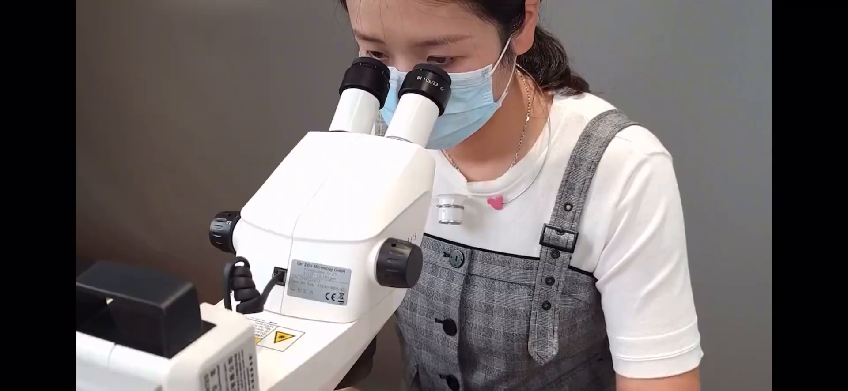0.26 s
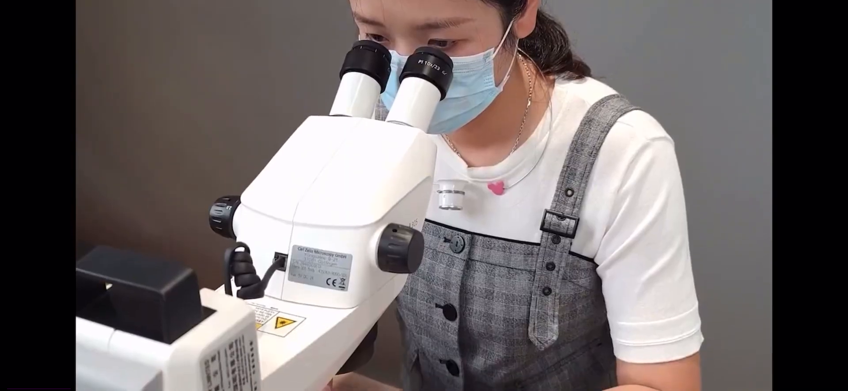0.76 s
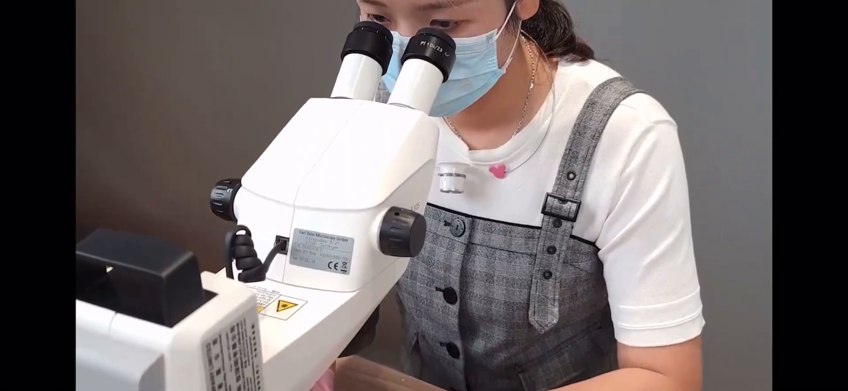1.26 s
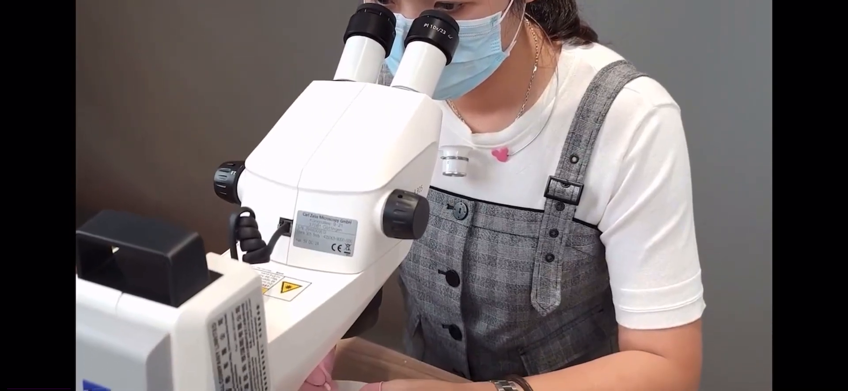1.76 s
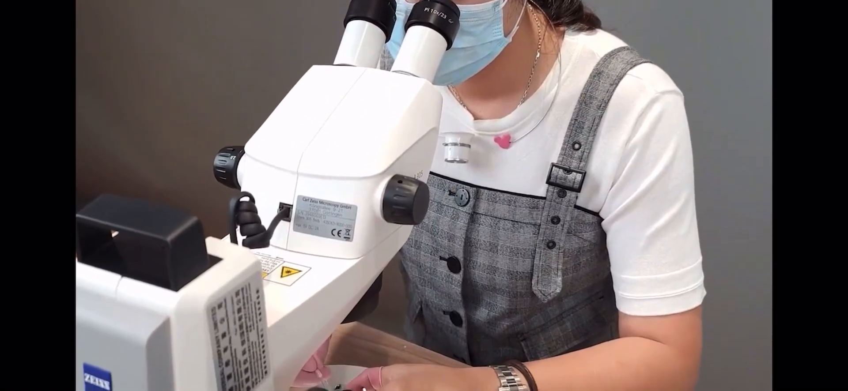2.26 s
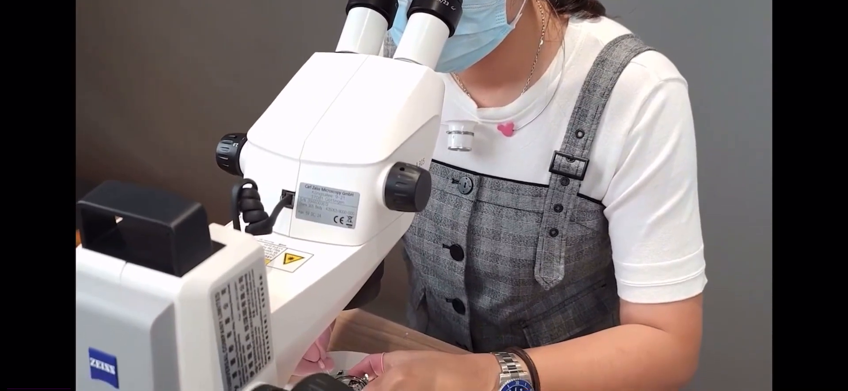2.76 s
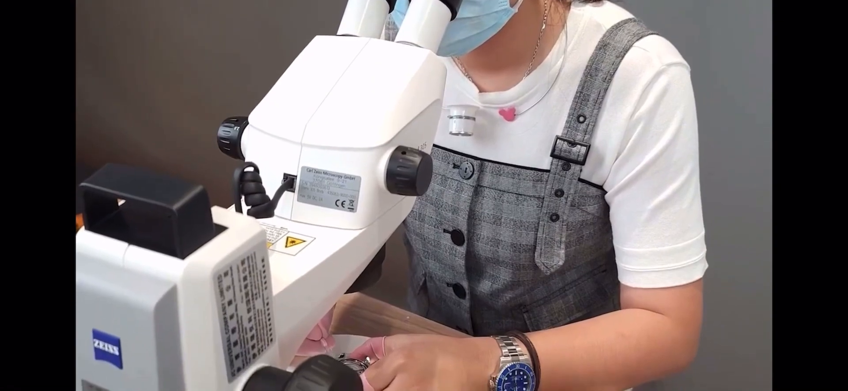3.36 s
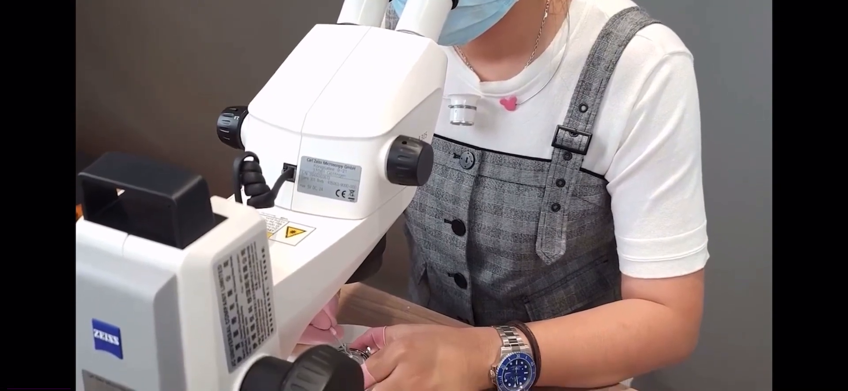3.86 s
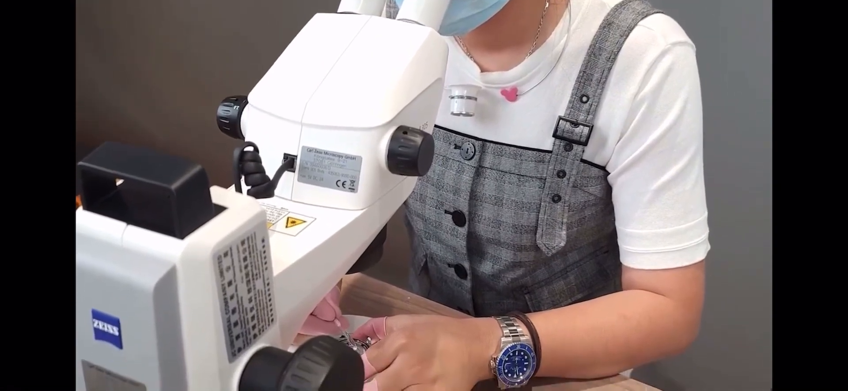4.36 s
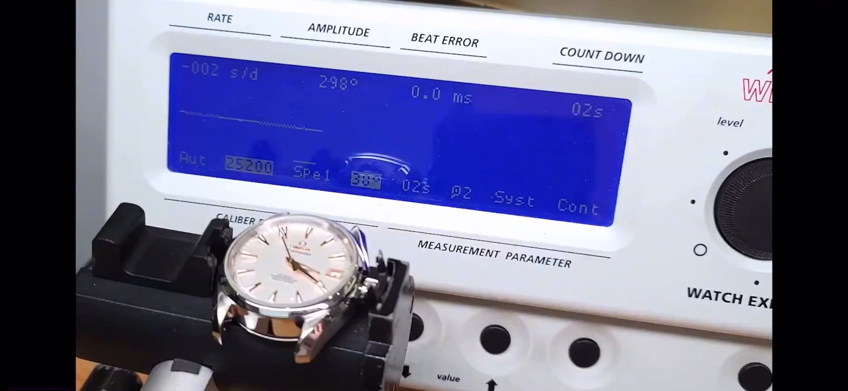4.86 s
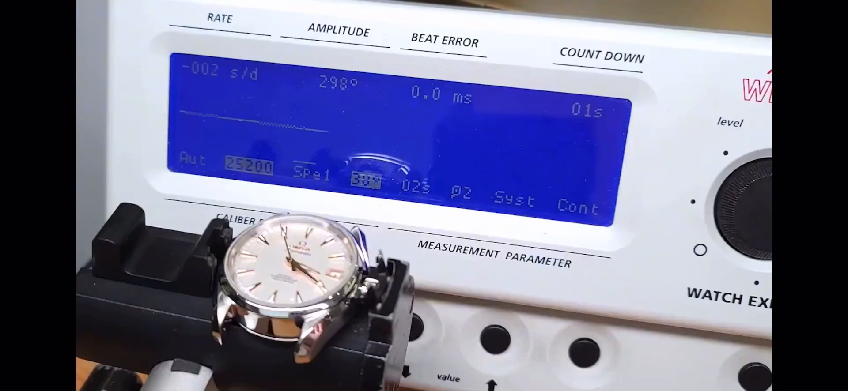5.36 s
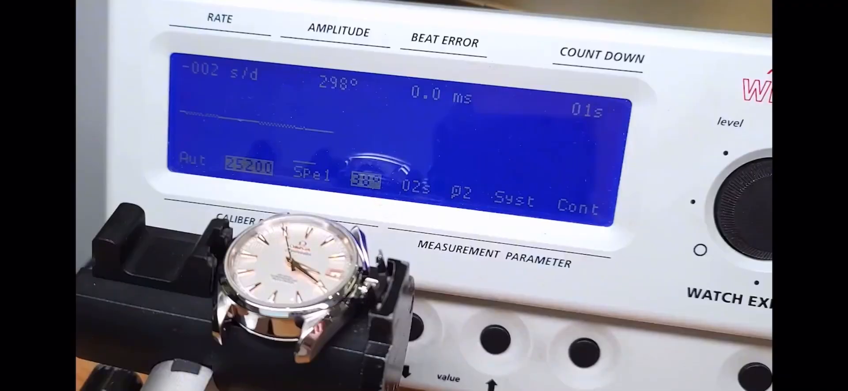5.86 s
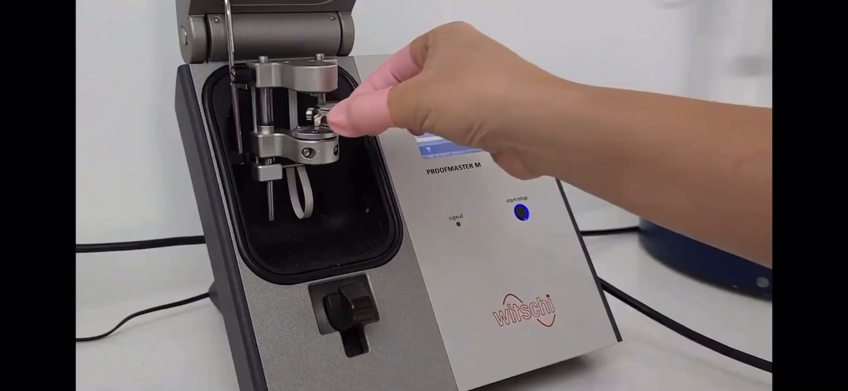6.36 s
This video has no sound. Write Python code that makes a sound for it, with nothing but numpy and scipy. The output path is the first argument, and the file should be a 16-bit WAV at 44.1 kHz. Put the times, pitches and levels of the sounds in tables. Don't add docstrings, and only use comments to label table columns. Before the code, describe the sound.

Quiet room with low ventilation rumble and crickets chirping, then a loud, bright, metallic watch tick cuts in at seven beats a second and stops abruptly.

```python
import sys
import numpy as np
from scipy import signal
from scipy.fft import rfft, irfft, next_fast_len
from scipy.io import wavfile
from scipy.ndimage import uniform_filter1d, map_coordinates

SR = 44100
rng = np.random.default_rng(int(sys.argv[2]) if len(sys.argv) > 2 else 0)


def to_wav(s):
    ch = np.atleast_2d(s).T
    pcm = np.round(np.clip(ch, -1, 1) * 32767)
    wavfile.write(sys.argv[1], SR, pcm.astype(np.int16))


def nominal_scale(level):
    x = np.asarray(level, float) / 20
    return 10 ** x


N = 291060

WATCH_ON_S, WATCH_OFF_S = 4.5675, 6.338
# centre_hz, width_hz, level_db
CASE_MODES = [(5610, 210, 7), (7330, 140, -6.5), (7866, 420, 11), (8670, 100, 6), (10060, 140, -1),
              (10450, 100, -68), (11420, 180, 3), (13900, 400, 1), (14450, 210, -1.5)]


def unit(x):
    return x / np.sqrt(np.mean(x ** 2) + 1e-20)


def along(points, hz):
    f, v = np.transpose(points)
    return np.interp(np.log(hz + 1), np.log(f + 1), v)


def wobble(rate):
    knots = rng.standard_normal(int(N * rate / SR) + 4)
    return map_coordinates(knots, [np.arange(N) * rate / SR])


def filtered(x, response):
    m = next_fast_len(N + 8192)
    return irfft(rfft(x, m) * response(np.fft.rfftfreq(m, 1 / SR)), m)[..., :N]


def closed(spectrum):
    return lambda hz: nominal_scale(along(spectrum, hz)) * (hz > spectrum[0][0]) * (hz < spectrum[-1][0])


def rush(gain, alike):
    def turn(hz):
        return np.arccos(np.clip(along(alike, hz), -1, 1)) / 2

    def mid_side(hz):
        return gain(hz) * [np.cos(turn(hz)), np.sin(turn(hz))]

    mid, side = filtered(rng.standard_normal((2, N)), mid_side)
    return unit(np.array([mid + side, mid - side]))


def mottled(x, depth_db):
    z = signal.stft(x, nperseg=512)[2]
    field = uniform_filter1d(rng.standard_normal(z.shape[1:]), size=2, axis=0)
    field = uniform_filter1d(field, size=12, axis=1)
    return unit(signal.istft(z * nominal_scale(depth_db * unit(field)), nperseg=512)[1][:, :N])


def echoed(x, pan_db, wet_db, t60):
    t = np.arange(SR // 4) / SR
    tail = rng.standard_normal((2, len(t))) * nominal_scale(-60 * t / t60)
    wet = signal.fftconvolve(x[None], tail / np.linalg.norm(tail[0]), axes=1)[:, :N]
    return x * nominal_scale([[pan_db / 2], [-pan_db / 2]]) + nominal_scale(wet_db) * wet


def strokes(rows, sag, bend, square, octave_db):
    out = np.zeros(N + SR)
    for s, ms, db, hz in rows:
        u = np.linspace(0, 1, round(ms * SR / 1000))
        phase = 2 * np.pi * np.cumsum(hz * (1 + sag * (0.56 ** bend - u ** bend))) / SR
        tone = np.sin(phase) + nominal_scale(octave_db) * (.5 + u) * np.sin(2 * phase)
        envelope = np.tanh(square * np.sin(np.pi * u) ** 2) / np.tanh(square)
        out[round(s * SR):][:len(u)] += nominal_scale(db) * envelope * tone
    return out[:N]


def lengthened(rows, factor):
    return [(s - ms * (factor - 1) / 2000, ms * factor, db, hz) for s, ms, db, hz in rows]


def watch():
    hits = contacts()
    now = np.arange(N) / SR
    gate = np.clip((now - WATCH_ON_S) / 0.00054, 0, 1) * np.clip((WATCH_OFF_S - now) / 0.0056, 0, 1)
    return gate * (struck_case(hits) * nominal_scale([[-.2], [.2]]) + ringing_room(hits))


def contacts():
    # drop_s, drop_db, bounce_after_ms, bounce_db, low_modes_db
    escapement_beats = [(4.6578, -17, 1.8, -14, -16), (4.8011, -8, 1.7, -13, -11),
                        (4.9438, -17, 1.4, -16, -8), (5.0868, -11, 1.7, -15, -13),
                        (5.2299, -15, 1.3, -15, -8), (5.3727, -8, 2.0, -13, -17),
                        (5.5161, -5.5, 2.1, -18, -26), (5.6578, -11, 2.1, -9, -15),
                        (5.8022, -12, 2.9, -25, -11), (5.9437, -8, 1.8, -8, -14),
                        (6.0864, -15, 1.4, -13, -6), (6.2292, -8, 1.8, -15, -12)]
    unlock_lead_ms, unlock_db = 4.9, (-26.5, -29.5)
    unlock_low_db, unlock_high_db = -13.5, -4.5
    settle_ms, settle_db = 1.5, -5.5
    rows = []  # start_s, peak_db, low_modes_db, high_modes_db
    for k, (s, db, bounce_ms, bounce_db, low_db) in enumerate(escapement_beats):
        bounce_s = s + bounce_ms / 1000
        high_db = -10 + 1.5 * (-1) ** k
        rows.append((s - unlock_lead_ms / 1000, unlock_db[k % 2], unlock_low_db, unlock_high_db))
        rows.append((s, db, low_db, high_db))
        rows.append((bounce_s, bounce_db, low_db, high_db))
        rows.append((bounce_s + settle_ms / 1000, bounce_db + settle_db, low_db, high_db))
    return rows


def struck_case(hits):
    t = np.arange(-88, 800) / SR
    hz, _, mode_db = np.transpose(CASE_MODES)[:, :, None]
    dry = np.zeros(N + SR)
    luck = rng.standard_normal((len(hits), 3, len(CASE_MODES), 1))
    for (s, db, low_db, high_db), (size, turn, lag) in zip(hits, luck):
        share_db = np.where(hz < 6700, low_db + 9.0, np.where(hz > 9500, high_db + 9.5, 0))
        modes = nominal_scale(mode_db + share_db + 2.14 * size) * np.cos(2 * np.pi * hz * t + np.pi * turn)
        late = t - .0002 * lag
        t60 = .012 if db < -23 else .0042
        onset, decay = np.exp(-(late / 0.00072) ** 2), nominal_scale(-60 * np.abs(late) / t60)
        ring = (modes * np.where(late < 0, onset, decay)).sum(0)
        dry[round((s + .0005) * SR) - 88:][:len(t)] += nominal_scale(db + 1) * ring / np.abs(ring).max()

    def loudspeaker(f):
        return 1 / np.sqrt(1 + (4700 / (f + 1)) ** 16 + (f / 15300) ** 24) + 0.012 * (f > 900)

    return filtered(dry[:N], loudspeaker)


def ringing_room(hits):
    # pitch_hz, level_db per Hz
    room_ringing = [(4400, -25), (4850, -34.5), (5150, -9), (5500, -6.5), (6200, -9), (6760, -12.5),
                    (7400, -3), (8600, -5.5), (9500, -11.5), (12600, -13.5), (13550, -25.5), (14400, -7.5),
                    (14900, -27), (15200, -44)]
    energy = np.zeros(N)
    for s, db, *_ in hits:
        energy[round(s * SR)] = nominal_scale(1.25 * db - 5)
    energy[round(4.516 * SR)] = nominal_scale(2 * -5.5)
    t = np.arange(SR) / SR

    def fade(t60, rise):
        decay = nominal_scale(-120 * t / t60) * (1 - np.exp(-t / rise))
        return np.sqrt(np.abs(signal.fftconvolve(energy, decay)[:N]))

    def tilted(db_per_octave):
        return lambda f: closed(room_ringing)(f) * nominal_scale(db_per_octave * np.log2(f / 8000 + 1e-3))

    def case_peaks(f):
        return 1 + sum(0.38 / (1 + (2 * (f - c) / w) ** 2) for c, w, _ in CASE_MODES)

    rattle = nominal_scale(-13.5) * fade(0.026, 0.0013) * rush(tilted(0.27), [(5000, 0.58)])
    dull = mottled(rush(tilted(-1), [(5000, 0.62), (14000, 0.31)]), depth_db=3.5)
    bright = mottled(rush(tilted(1.3), [(5000, 0.79), (14000, 0.38)]), depth_db=5.0)
    tail = nominal_scale(-34.5) * fade(0.74, 0.0081) * dull + nominal_scale(-34.0) * fade(0.41, 0.0084) * bright
    flutter = nominal_scale(2.2 * wobble(110))
    return rattle + flutter * filtered(tail, case_peaks)


def crickets():
    return near_cricket() + rival_cricket() + left_crickets() + low_cricket() + triller()


def near_cricket():
    near = strokes(lengthened(near_strokes(), 1.3), sag=.06, bend=4, square=1.8, octave_db=-24)
    return nominal_scale(-1.1) * echoed(near, 0, wet_db=-20.5, t60=0.26)


def near_strokes():
    # start_s, strokes, peak_db
    near_chirps = [
        (1.7494, 8, -29),
        (2.0295, 8, -29.7),
        (2.3096, 8, -29.5),
        (2.5933, 8, -29.3),
        (3.0741, 7, -30),
    ]
    first_gap_ms, gap_growth_ms = 13.5, .6
    first_stroke_ms, stroke_growth_ms = 8.2, .45
    slip_s, slip, delay_ms = 3.147, (6.6, -33, 4800), 1.6
    rows = []  # start_s, length_ms, peak_db, pitch_hz
    for start, count, db in near_chirps:
        for k in range(count):
            s = start + (k * first_gap_ms + gap_growth_ms * k * (k - 1) / 2) / 1000
            if abs(s - slip_s) < .005:
                rows.append((s, *slip))
                continue
            s += delay_ms / 1000 * (s > slip_s)
            rows.append((s, first_stroke_ms + stroke_growth_ms * k, db - 4 * (k == 0), 4915 - 50 / 3 ** k))
    return np.array(rows) + rng.standard_normal((len(rows), 4)) * (.0003, .4, .6, 14)


def rival_cricket():
    # start_s, strokes, peak_db
    rival_chirps = [
        (1.66, 6.8, -55),
        (1.92, 15, -56.5),
        (2.22, 8.8, -59),
        (2.53, 8, -57),
        (2.85, 6.5, -56.5),
        (3.19, 4.3, -54),
    ]
    rows = [(s + .016 * k, 12, db, 4930) for s, count, db in rival_chirps for k in range(int(count))]
    rival = strokes(rows, sag=0.23, bend=4.8, square=4.0, octave_db=-13.5)
    return echoed(rival, pan_db=-2.0, wet_db=-7, t60=0.27)


def left_crickets():
    # first_full_stroke_s, full_strokes, peak_db
    left_chirps = [(.091, 4, -50), (.413, 4, -52), (.699, 3, -51.5), (1.052, 3, -51.5), (1.359, 3, -51),
                   (1.657, 3, -49), (1.946, 4, -49.5), (2.259, 3, -48.5), (2.561, 3, -50),
                   (2.883, 3, -50.5), (3.185, 3, -48.5), (3.464, 3, -50.5), (3.771, 3, -48.5),
                   (4.058, 3, -51), (4.376, 3, -50.5), (4.756, 3, -49), (5.075, 3, -49), (5.39, 3, -48.5),
                   (5.705, 3, -45.5), (6.113, 3, -48.5), (6.395, 3, -53)]
    # first_full_stroke_s, full_strokes, peak_db
    slow_chirps = [(.55, 3, -54.5), (.894, 3, -57), (1.245, 2, -54.5), (1.59, 2, -56), (2.414, 2, -56),
                   (2.745, 3, -56), (3.884, 1, -55), (4.184, 2, -54), (4.588, 3, -51), (4.997, 2, -51.5),
                   (5.278, 1, -55), (6.261, 1, -50), (6.53, 2, -55)]
    both = [*left_strokes(left_chirps, 33.5, 0), *left_strokes(slow_chirps, 38.5, shift_hz=-100)]
    left = strokes(lengthened(both, 1.25), sag=.14, bend=2.6, square=1.3, octave_db=-30)
    return nominal_scale(-4) * echoed(left * nominal_scale(1.2 * wobble(150)), pan_db=10, wet_db=-6, t60=.09)


def left_strokes(chirps, gap_ms, shift_hz):
    # level_db, pitch_hz
    stroke_swell = [(-2.5, 4500), (-1, 4490), (0.5, 4506), (-8, 4450)]
    lead_ms, pick_ms, pick_db, pick_hz = 23.5, 12.5, -7, 4362
    rows = [(s - lead_ms / 1000, pick_ms, db + pick_db, pick_hz + shift_hz) for s, _, db in chirps]
    for s, count, db in chirps:
        for k in range(round(count)):
            swell_db, hz = stroke_swell[k]
            rows.append((s + k * gap_ms / 1000, 20, db + swell_db, hz + shift_hz))
    return np.array(rows) + rng.standard_normal((len(rows), 4)) * [.001, 1.5, 1, 40]


def low_cricket():
    # start_s, length_ms, peak_db, pitch_hz
    low_wing_strokes = [(1.9, 14, -60, 3700), (1.951, 18, -60, 3690), (2.0, 14, -57, 3680),
                        (2.351, 18, -56, 3720), (2.395, 19, -55, 3690), (2.448, 15, -54, 3740),
                        (2.995, 19, -55, 3700), (3.048, 23, -53, 3760)]
    low = strokes(low_wing_strokes, sag=.05, bend=2.2, square=2.5, octave_db=-40)
    return echoed(low, pan_db=1.2, wet_db=-10, t60=.1)


def triller():
    beat = np.cumsum(33.4 + 0.77 * wobble(1.62)) / SR + 0.31
    swell = np.sin(np.pi * beat) ** 4 * nominal_scale(0.74 * wobble(9))
    trill = swell * np.sin(2 * np.pi * np.cumsum(2905 + 22 * wobble(60)) / SR)
    return nominal_scale(-68) * echoed(trill, pan_db=-1.2, wet_db=-4.5, t60=0.42)


def bench():
    # start_s, peak_db, t60_s
    handling_taps = [
        (1.6821, -67, 0.046),
        (2.3994, -60, 0.04),
        (6.5011, -63, 0.049),
        (6.521, -54, 0.087),
    ]
    # start_s, length_ms, peak_db, pitch_hz
    far_drips = [
        (4.625, 30, -56.5, 780),
        (4.89, 21, -56, 895),
        (5.53, 17, -51.5, 700),
    ]
    # (pitch_hz, level_db per Hz)
    sleeve_rustle = (6.34, -68, [(500, -10), (800, -4), (1200, 0), (1700, -10)])
    t, shape = np.arange(SR // 4) / SR, np.zeros(N + SR)
    for s, db, t60 in handling_taps:
        shape[round(s * SR):][:len(t)] += nominal_scale(db + 4.5 - 60 * t / np.abs(t60))
    taps = shape[:N] * rush(closed([(1500, -11), (5000, 0.0), (9000, 5.0), (15500, -3)]), [(5000, 0.48)])
    start, db, colour = sleeve_rustle
    present = np.arange(N) / SR > start
    rustle = nominal_scale(db + 2.5 * wobble(17)) * present * rush(closed(colour), [(1000, .3)])
    return taps + rustle + strokes(far_drips, sag=0.075, bend=1.2, square=0.99, octave_db=-35)


def air():
    # start_s, rumble_db, hiss_db, chorus_db
    background_steps = [
        (0, -45.5, -66.5, -65.8),
        (.333, -45, -63.5, -66.5),
        (4.567, -45.5, -66, -62.5),
        (6.338, -43.5, -62.5, -66),
    ]
    # pitch_hz, level_db per Hz
    rumble_colour = [(12, -30), (28, -16), (60, -5.5), (77, 0), (103, -6.5), (151, -9.5), (180, -12.5),
                     (241, -16.5), (392, -24.5), (506, -29.5), (780, -45.5)]
    # pitch_hz, level_db per Hz
    hiss_colour = [(300, -26.5), (600, 0.5), (1000, -2.5), (2000, -7), (3600, -10.5), (6100, -12),
                   (6800, -18.5), (8000, -12.5), (9000, -17), (13500, -22), (13900, -32)]
    # pitch_hz, level_db per Hz
    chorus_colour = [(4300, -15), (4800, -12.5), (5100, -3.5), (5600, -7.5), (6000, -15.5), (6500, -26)]
    # pitch_hz, likeness (0 to 1)
    air_likeness = [(60, 0.97), (290, 0.92), (640, 0.55), (1400, 0.009), (15000, 0.09)]
    s, *columns = np.transpose(background_steps)
    now = np.arange(N) / SR
    step_index = np.maximum(np.searchsorted(s, now, side="right") - 1, 0)
    rumble_db, hiss_db, chorus_db = [uniform_filter1d(c[step_index], size=900) for c in columns]
    joined = np.clip(np.minimum(now - 1.63, 3.27 - now) / 0.15 + .5, 0, 1)
    chorus_db = chorus_db + 3.1 * joined
    rumble = nominal_scale(rumble_db + 0.28 * wobble(6.7)) * rush(closed(rumble_colour), air_likeness)
    hiss = nominal_scale(hiss_db + 3.5 + 0.76 * wobble(8)) * rush(closed(hiss_colour), air_likeness)
    shimmer = nominal_scale(2.0 * np.array([wobble(60), wobble(60)]) + 1.4 * wobble(3.1))
    chorus = nominal_scale(chorus_db + 5.0) * shimmer * rush(closed(chorus_colour), [(5000, 0.067)])
    return rumble + hiss * nominal_scale([[-.7], [.7]]) + chorus


def fan_hum():
    phase = 2 * np.pi * np.cumsum(215 + 1.504 * wobble(4)) / SR
    return nominal_scale(-59 + 3.2 * wobble(3.5)) * np.sin(phase)


def scene():
    now = np.arange(N) / SR
    corners_s = [WATCH_ON_S - .01, WATCH_ON_S, WATCH_OFF_S, WATCH_OFF_S + .01]
    duck = nominal_scale(-3.5 * np.interp(now, corners_s, [0, 1, 1, 0]))
    return watch() + duck * crickets() + bench() + air() + fan_hum()


def starved(x, below_db, least_db, slope):
    z = signal.stft(x, SR, nperseg=1024)[2]
    band_power = (np.abs(z[:, :512]) ** 2).mean(0).reshape(128, 4, -1).mean(1)
    level = 10 * np.log10(band_power + 1e-16)
    busy = np.minimum(level[28:76].mean(0) + 98, 26)
    limit = np.maximum(level[26:].max(0) + below_db, least_db + slope * busy)
    kept = uniform_filter1d(level - limit, size=3, axis=1) > 0
    z[:, :512] *= np.repeat(kept, 4, axis=0)
    return signal.istft(z, SR, nperseg=1024)[1][:, :N]


def band_limit(x):
    return signal.sosfilt(signal.butter(12, 16430, fs=SR, output="sos"), x)


def record(dry):
    mix = starved(dry, below_db=-47, least_db=-102, slope=.5)
    return band_limit(mix)


dry = scene()
out = record(dry)
to_wav(out)
```